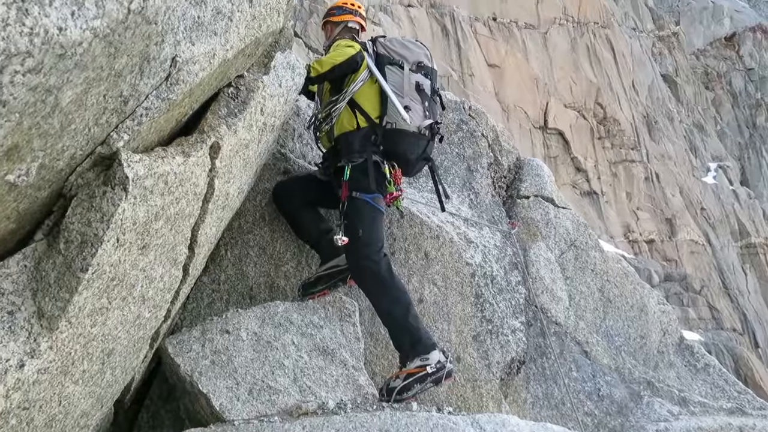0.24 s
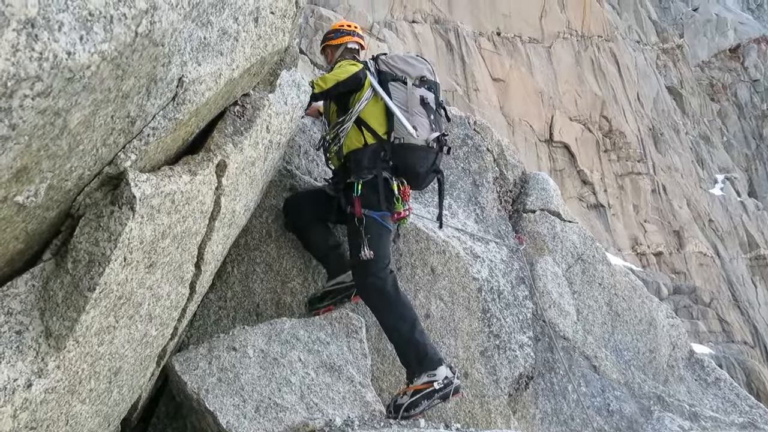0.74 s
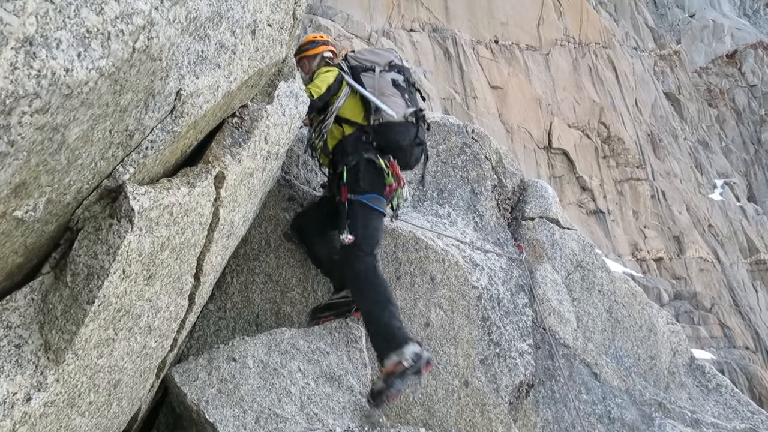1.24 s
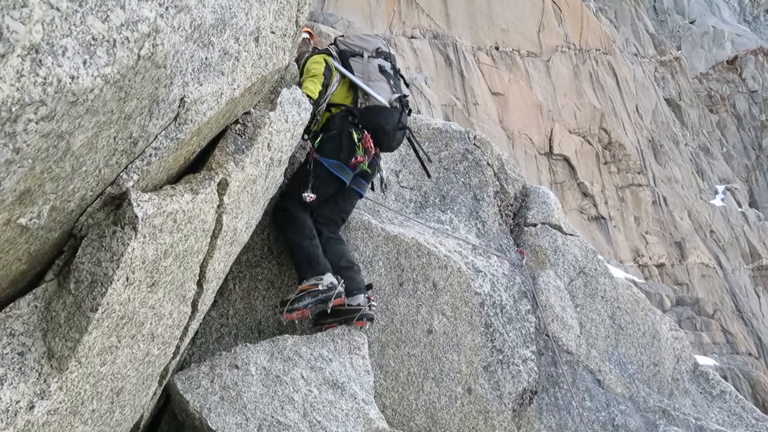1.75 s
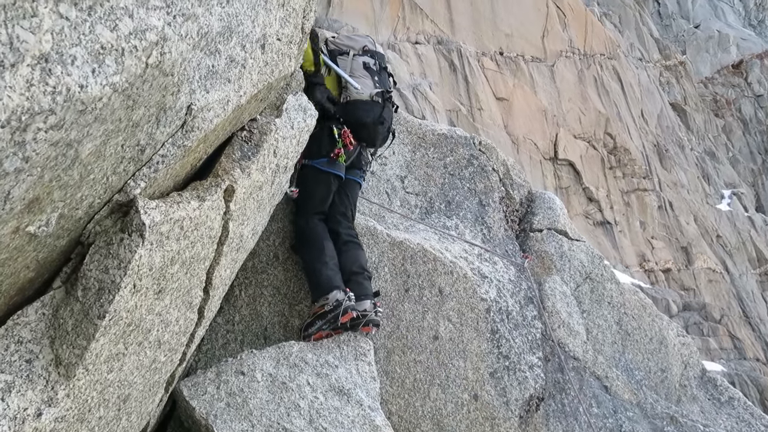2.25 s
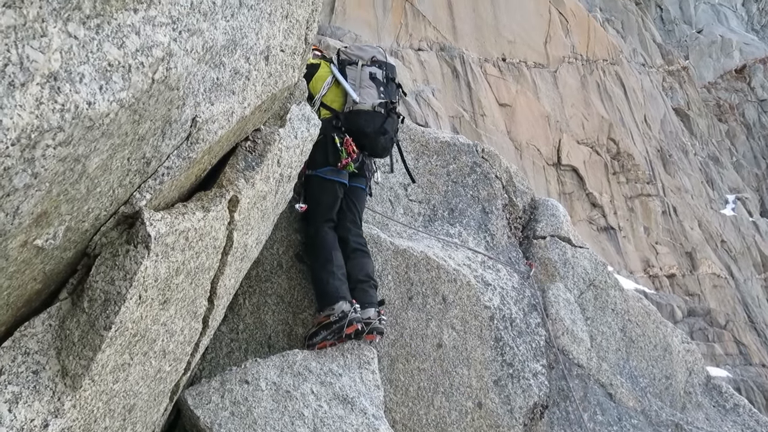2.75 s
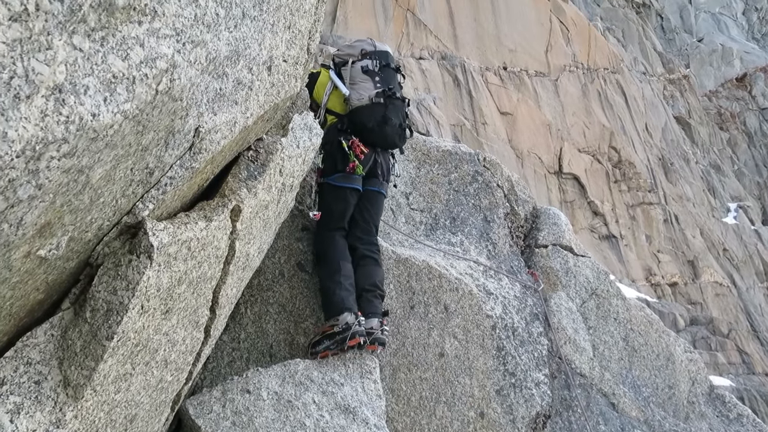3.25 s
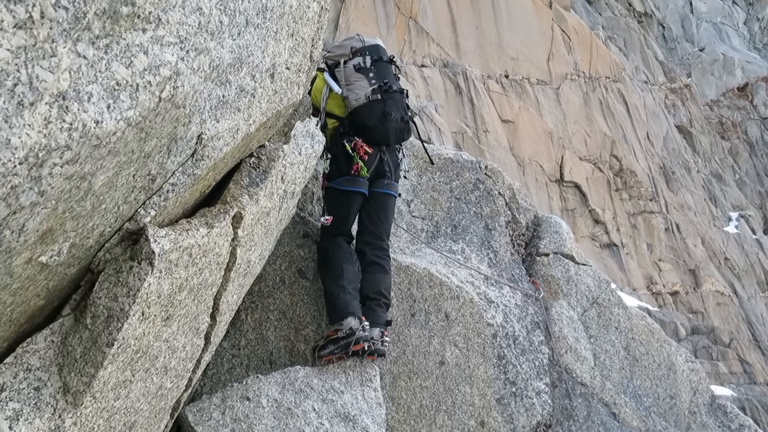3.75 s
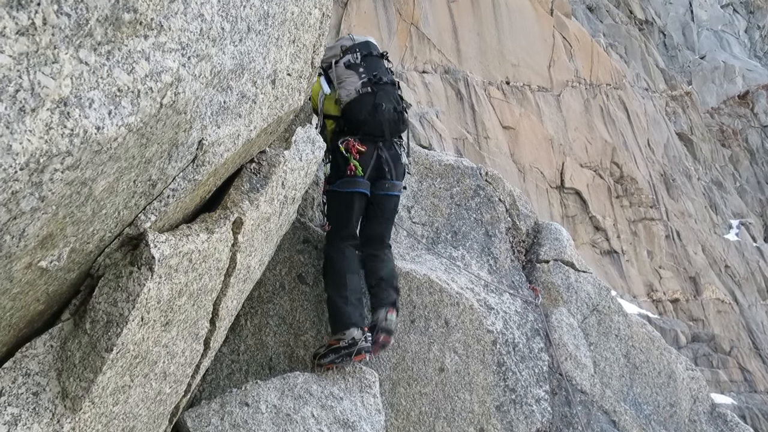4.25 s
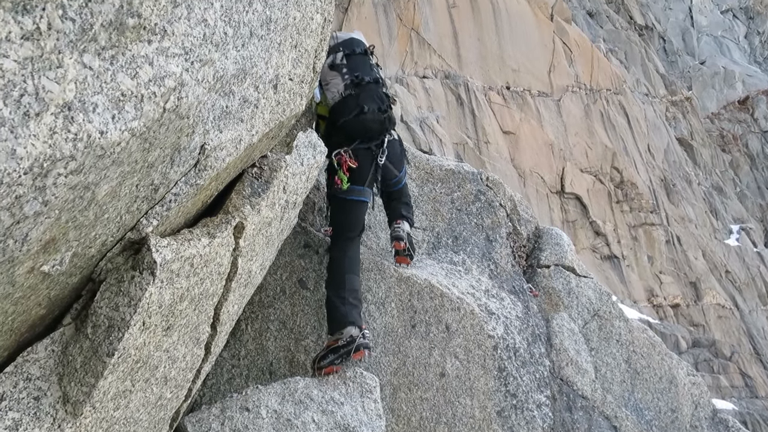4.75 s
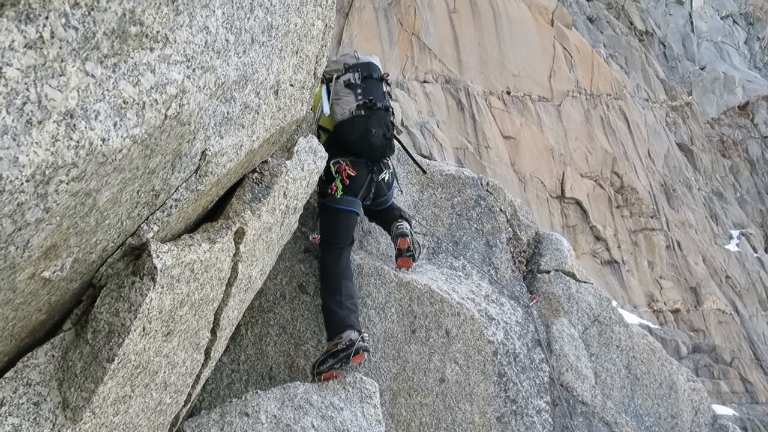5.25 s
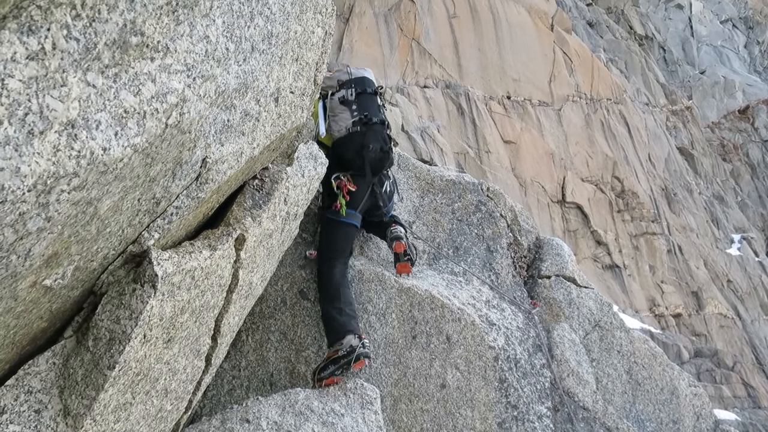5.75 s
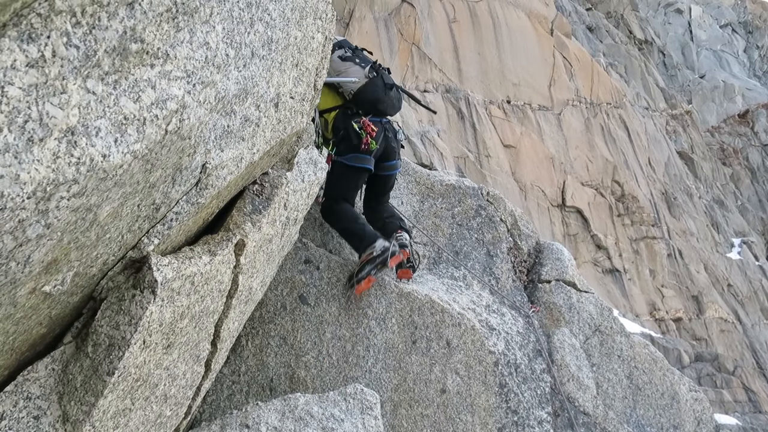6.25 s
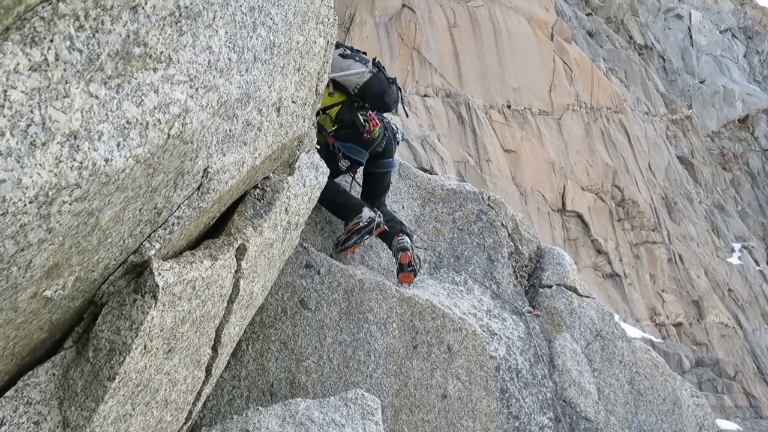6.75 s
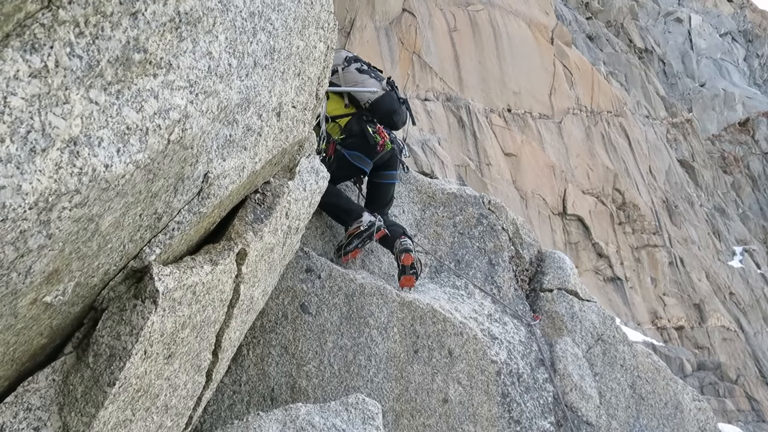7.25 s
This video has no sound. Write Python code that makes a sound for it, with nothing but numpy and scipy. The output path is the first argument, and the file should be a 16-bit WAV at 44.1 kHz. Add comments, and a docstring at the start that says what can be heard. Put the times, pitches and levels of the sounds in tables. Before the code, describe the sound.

A steady, wide rush of wind and far meltwater fills open mountain air. Close to centre, heard from a few metres, spiked boots bite and scrape rock with dry, bright clicks and low thumps, among clothing rustles, loose grit and small carabiner clinks. Activity is busy early, then a sudden, sharp, very loud metallic strike comes after four seconds; the background dips and slowly recovers through lighter clicks. A thin bird whistles far off.

```python
"""A climber in crampons scrambles up granite, heard from a few metres away in open mountain air.
Filtered noise makes the wide wind and water, the rustle of clothes and pack and the ticks of loose grit.
Steel points then click and scratch as shaped noise through resonances, and boots thud as damped sines.
Carabiners chime as sine pairs, a far bird whistles in gliding sines, and boots drag as juddering noise.
Just after 4 s one hard kick makes the limiter duck everything, and the level climbs back slowly."""
import sys
import numpy as np
from scipy import signal
from scipy.fft import rfft, irfft, next_fast_len
from scipy.io import wavfile
from scipy.ndimage import uniform_filter1d

SR = 44100
rng = np.random.default_rng(int(sys.argv[2]) if len(sys.argv) > 2 else 0)


def transcribe(u):
    """Save the signal u as a 16-bit wav file named by the first command-line argument.

    u: samples, shape (n,) or (channels, n), limited to [-1, 1]; the rate is SR.
    q: integer samples, one column per channel.
    """
    v = np.clip(np.atleast_2d(u).T, -1, 1)
    q = np.round(v * 32767).astype(np.int16)
    wavfile.write(sys.argv[1], SR, q)


N = 330309

# stereo width of every noisy sound from the climber: (f/Hz, side minus mid/dB)
CLIMBER_WIDTH = [(300, -18), (2400, -19), (5000, -4.5), (8000, -4), (14000, -1)]


def amp(db):
    """Turns decibels into an amplitude factor."""
    return 10 ** (np.asarray(db) / 20)


def evened(x):
    """Scales a signal to unit RMS."""
    return x / np.sqrt(np.mean(x ** 2) + 1e-20)


def read(points, hz):
    """Reads a spectrum at hz, interpolating on a log-frequency axis."""
    f, value = np.transpose(points)
    return np.interp(np.log(hz + 1), np.log(f), value)


def add(mix, s, sound):
    """Mixes a sound in at time s."""
    part = mix[..., max(round(s * SR), 0):][..., :sound.shape[-1]]
    part += sound[..., :part.shape[-1]]


def blow(x, db):
    """Scales each channel of a short sound to the energy of 10 ms at the level db."""
    energy = np.sum(x ** 2, -1, keepdims=True)
    return amp(db) * x / np.sqrt(energy / (SR / 100) + 1e-20)


def causal(db):
    """The minimum-phase response with this gain: it rings after a blow, never before."""
    cepstrum = irfft(np.log(amp(db)))
    half = len(cepstrum) // 2
    # fold the cepstrum onto positive time
    cepstrum[1:half] *= 2
    cepstrum[half + 1:] = 0
    return np.exp(rfft(cepstrum))


def spread(pair, width):
    """Turns two unrelated signals into left and right, with a width that depends on frequency."""
    size = pair.shape[-1]
    mid, side = rfft(pair)
    share = amp(read(width, np.fft.rfftfreq(size, 1 / SR)))
    left_right = np.array([mid + share * side, mid - share * side])
    return irfft(left_right / np.sqrt(1 + share ** 2), size)


def tinted(x, colour):
    """Gives a signal a spectrum; the result is padded to a fast transform length."""
    size = next_fast_len(N)
    gain = amp(read(colour, np.fft.rfftfreq(size, 1 / SR)))
    return irfft(rfft(x, size) * gain, size)


def wander(per_s):
    """A random curve of unit RMS: straight lines between per_s random points a second."""
    knots = rng.standard_normal(N // 16)
    return evened(np.interp(np.arange(N) * per_s / SR, np.arange(len(knots)), knots))


def valley(level_db=-43, swell_db=-0.5, flicker_db=1.0):
    """The wide rush of far wind and meltwater: coloured noise with a slow swell and a fast flicker."""
    # noise spectrum of the rush: (f/Hz, level per Hz/dB)
    rush_colour = [(15, -30), (40, -11), (120, 1.5), (300, 0.5), (550, -0.5), (770, -3), (1150, -0.5),
                   (1400, -3), (1530, -9), (2400, -10), (4200, -13.5), (9000, -18.5), (12000, -20),
                   (16000, -22.5)]
    # stereo width of the rush: (f/Hz, side minus mid/dB)
    rush_width = [(60, -19), (110, 1.5), (200, 1.5), (380, 1), (700, -2.5), (1290, -3), (2380, -5),
                  (4400, -6), (8120, -2), (15000, -2.5)]
    rush = spread(tinted(rng.standard_normal((2, N)), rush_colour), rush_width)[:, :N]
    return evened(rush) * amp(level_db + swell_db * wander(3.08) + flicker_db * wander(35))


def movement(rest_db=-51.5, rise_s=0.047, release_s=0.11):
    """How hard the climber moves: each move swells, holds and dies away over a faint rustle."""
    # reaches, pulls and leg swings that rub cloth, pack and grit, before each layer's own trim:
    # (start t/s, hold length/s, level/dB)
    moves = [(0.162, 0.052, -45.5), (1.27, 0.29, -44), (1.68, 0.14, -44), (2.067, 0.13, -39.5),
             (2.547, 0.62, -50), (3.616, 0.2, -47), (4.035, 0.024, -35.5), (4.826, 0.16, -46.5),
             (5.152, 0.078, -43), (5.542, 0.016, -52), (5.893, 0.071, -46), (7.097, 0.025, -43.5)]
    t = np.arange(N) / SR
    power = amp(rest_db) ** 2
    for s, length, db in moves:
        swell = np.minimum(t - s, 0) / rise_s
        release = np.maximum(t - s - length, 0) / release_s
        power = power + (amp(db) * np.exp(swell - release)) ** 2
    return np.sqrt(power)


def rubbing(trim_db=-1, flutter_db=2, grains_per_s=260, grain_spread_db=3.5, grain_share=0.96, grain_s=0.0027):
    """Fabric hiss and decaying snaps of grit, both following the climber's movement."""
    # noise spectrum of the rubbing: (f/Hz, level per Hz/dB)
    rub_colour = [(200, -12), (600, 5.5), (1500, -9), (3000, 5), (5000, 1.5), (7000, 0), (10000, -0.5),
                  (13000, 3), (16000, -7.5)]
    grain_db = grain_spread_db * np.minimum(rng.exponential(1, N), 3)
    grains = amp(grain_db) * (rng.random(N) < grains_per_s / SR)
    # each grain starts an exponential decay
    snaps = signal.lfilter([1], [1, -np.exp(-1 / (grain_s * SR))], grains)
    hiss, grit = rng.standard_normal((2, 2, N))
    force = hiss + grain_share * evened(grit * snaps)
    force *= amp(flutter_db * wander(70))
    sound = evened(spread(tinted(force, rub_colour), CLIMBER_WIDTH)[:, :N])
    return sound * amp(trim_db) * movement()


def loose_grit(trim_db=-3, ticks_per_s=26, spread_db=2, tick_s=0.0011,
               low_hz=2500, high_hz=13000, octaves=.7, size=1024):
    """Crumbs of granite and small buckles tick at random as resonant bursts, louder in each move."""
    out, effort = np.zeros((2, N)), movement()
    t, hz = np.arange(size) / SR, np.fft.rfftfreq(size, 1 / SR) + 1
    chance, strength, pitch = rng.random(N), rng.standard_normal(N), rng.random(N)
    noise = rng.standard_normal((2, N + size))
    for at in np.flatnonzero(chance < ticks_per_s / SR):
        centre_hz = low_hz * (high_hz / low_hz) ** pitch[at]
        colour = -10 * np.log10(1 + (np.log2(hz / centre_hz) / octaves) ** 2)
        burst = noise[:, at:at + size] * np.exp(-t / tick_s)
        tick = spread(irfft(rfft(burst) * causal(colour)), CLIMBER_WIDTH)
        add(out, at / SR, effort[at] * blow(tick, trim_db + spread_db * strength[at]))
    return out


def contacts(bite_skid_s=0.0022, bite_skid_db=-17.5, skid_share=0.67,
             bar_hz=2470, bar_db=2.5, point_hz=4630, point_db=2.5):
    """Bites skid quietly and then catch at once; scratches swell for skid_share of their fade.

    Each is (s, dB, skid s, skid dB, crunch s, tilt, broad ring Hz, its dB, narrow ring Hz, its dB).
    """
    # a steel point biting into rock; a free point rings high, one under the climber's weight low:
    # (t/s, level over 10 ms/dB, crunch decay/s, tilt/dB per octave, broad ring f/Hz, ring height/dB)
    bites = [(0.078, -33.5, 0.0056, 3.5, 5440, 5), (0.141, -29, 0.0039, 2, 5600, 3),
             (0.153, -25, 0.0047, 0.5, 5300, 10.5), (0.3507, -43, 0.0014, 2, 11600, 15),
             (0.417, -41.5, 0.0024, 14, 10000, 3), (0.4844, -36.5, 0.0028, 0, 4400, 10),
             (0.541, -37, 0.0021, 2.5, 7300, 3), (0.8455, -31.5, 0.00055, 2.5, 620, 25),
             (1.242, -17, 0.0033, 1.5, 6160, 13.5), (1.2872, -22.5, 0.0062, 0, 6440, 13),
             (1.6613, -28.5, 0.0049, -2, 2290, 5.5), (1.7644, -23, 0.00082, -0.5, 4180, 15.5),
             (1.7736, -25, .001, 0, 5270, 20.5), (1.902, -30.5, 0.005, -1.5, 5170, 15),
             (2.1078, -23, 0.013, -4, 560, -10), (2.1483, -28, 0.00042, -3.5, 5200, 6),
             (2.2, -33.5, .001, 4, 11800, 6), (2.2565, -29, 0.0013, 4.5, 6100, 4),
             (2.398, -27, 0.00076, -3.5, 2160, 6), (2.585, -31.5, 0.0011, 1, 10100, 4),
             (2.8612, -35, 0.00041, -4, 4000, 2), (2.987, -37.5, 0.007, -0.5, 10750, 8),
             (3.1083, -30.5, 0.00045, -1.5, 5160, 10.5), (3.393, -36, .002, 1, 9400, 4),
             (3.4419, -29.5, 0.0028, -0.5, 4400, 9.5), (3.6274, -33.5, 0.003, -3.5, 3400, 9),
             (3.8645, -31, 0.0081, -2, 680, 6), (3.9615, -30, 0.0036, -3.5, 600, 4),
             (3.9752, -25.5, 0.0051, -2, 3300, 5), (4.0478, 4.5, 0.0025, 3, 6500, 9.5),
             (4.2972, -24.5, 0.0002, 1.5, 680, 13), (4.4435, -26, 0.0064, -.2, 600, 3),
             (4.5427, -37, 0.0012, 0, 6100, 9), (4.607, -26.5, 0.00078, 0, 6660, 9),
             (4.783, -33, 0.0033, 0.5, 586, 18), (4.911, -33.5, .001, 4, 5300, 10),
             (4.9304, -32, 0.0033, 3, 8000, 5), (5.0035, -35.5, 0.00091, 1.5, 5500, 6),
             (5.0352, -34, 0.0016, -1, 5600, 7), (5.1235, -22.5, .0013, 4, 8700, 8),
             (5.203, -30.5, 0.00056, -2, 8600, 20), (6.052, -37, .001, 0, 12000, 5),
             (6.1425, -36, 0.0017, 1, 2960, 6), (6.1884, -36, 0.0028, -1, 13000, 10),
             (6.7099, -34, 0.0037, -4, 576, 13), (6.8154, -23.5, 0.0098, -1.5, 684, 15),
             (6.9287, -37.5, .006, 2.5, 700, 8), (6.9939, -38, 0.00056, -9.5, 2200, 9),
             (7.0355, -37, .004, 3, 12500, 5), (7.0883, -38, .001, -1, 3700, 4),
             (7.1387, -37.5, 0.0021, -2, 3200, 3), (7.173, -40, 0.0022, -1.5, 3400, 4),
             (7.258, -34.5, 0.009, 4, 11500, 8)]
    # a point scratching across crystals:
    # (peak t/s, level over 10 ms/dB, fade/s, tilt/dB per octave, squeal f/Hz, height before focus/dB)
    scratches = [(0.252, -32, 0.011, -2, 3490, 10), (0.7127, -33.5, 0.0064, 2.5, 3270, 20),
                 (0.87, -28.5, 0.016, -3, 3260, 5), (1.3282, -28, 0.0093, 1, 4000, -3),
                 (1.3437, -27, 0.0094, -0.5, 6500, -12), (2.1578, -34, 0.015, -2.5, 3120, 2),
                 (2.244, -37, .006, -2.5, 4450, 6), (3.519, -29.5, 0.013, -1, 3300, -4),
                 (3.606, -31, 0.0067, 0, 2890, 18), (3.6563, -36, .009, -1.5, 3100, 4),
                 (3.7264, -32.5, .014, 0, 2880, 12), (3.7457, -34, 0.0088, -3.5, 4600, 5),
                 (4.0546, -3.5, 0.004, -1.2, 2350, 6), (4.0698, -10.5, 0.0095, -1, 2390, 8),
                 (4.0925, -20.5, 0.0055, -2, 4300, 0), (4.2756, -29, 0.0092, -0.5, 2260, 13),
                 (4.8231, -14.5, .0033, 2.5, 2880, 9), (4.8586, -32, 0.012, 0, 4870, 7),
                 (5.2318, -33.5, 0.01, 2, 4400, 11), (5.9354, -31.5, 0.016, -1.7, 7750, 9),
                 (6.2443, -39.5, 0.0076, -1.5, 2820, 18), (7.303, -38, 0.008, -9.5, 2800, 6)]
    # the crampon's side bar answers every bite
    for s, db, crunch, tilt, ring_hz, ring_db in bites:
        yield s, db, bite_skid_s, bite_skid_db, crunch, tilt, ring_hz, ring_db, bar_hz, bar_db
    # the steel point rings broadly under every scratch
    for s, db, fade, tilt, squeal_hz, squeal_db in scratches:
        yield s, db, skid_share * fade, 0, fade, tilt, point_hz, point_db, squeal_hz, squeal_db


def frame_ring(hz, width_hz=90):
    """The click itself plus the short ring of each steel mode, as a complex response."""
    # modes of the steel crampon frame: (f/Hz, level over the plain click/dB)
    steel_modes = [(2385, -10), (4338, -5.5), (6058, -8), (6582, -10), (6911, -12), (8720, -35),
                   (8919, -13), (11005, -9), (11980, -5), (12720, 4), (14031, -17)]
    return 1 + sum(amp(db) / (1 + 2j * (hz - mode_hz) / width_hz) for mode_hz, db in steel_modes)


def ring(hz, centre_hz, height_db, focus_db=2.5, octaves=.095):
    """A sharp resonance, in dB, standing on a flat spectrum; focus_db raises its height."""
    skirt = (1 + (np.log2(hz / centre_hz) / octaves) ** 2) ** 2
    return 10 * np.log10(1 + amp(height_db + focus_db) ** 2 / skirt)


def crampons(scatter_db=-11, scatter_s=0.0097, far_db=-25, far_s=0.02, broad_octaves=0.34,
             grit_db=3, direct_side_db=-2, scatter_side_db=3, size=8192):
    """A point skids, bites and crushes grains; steel rings briefly and nearby rock scatters the sound."""
    out = np.zeros((2, N))
    hz = np.fft.rfftfreq(size, 1 / SR) + 10  # the offset keeps the logarithms finite
    t = (np.arange(size) - size // 8) / SR  # zero at the bite, with room for the skid ahead
    after, steel = np.maximum(t, 0), frame_ring(hz)
    echo = np.hypot(amp(scatter_db) * np.exp(-after / scatter_s), amp(far_db) * np.exp(-after / far_s))
    for s, db, skid, skid_db, crunch, tilt, broad_hz, broad_db, narrow_hz, narrow_db in contacts():
        contact, scatter, grit = rng.standard_normal((3, 2, size))
        onset = np.where(t < 0, amp(skid_db) * np.exp(-(t / max(skid, 1 / SR)) ** 2), 1)
        roughness = amp(grit_db * evened(uniform_filter1d(grit[0], size=24)))
        contact *= onset * np.exp(-after / max(crunch, 1 / SR)) * roughness
        scatter *= onset * echo
        # rows are mid and side
        force = contact * amp([[0], [direct_side_db]]) + scatter * amp([[0], [scatter_side_db]])
        colour = tilt * np.log2(np.maximum(hz, 600) / 4000)
        colour += broad_db * np.exp(-.5 * (np.log2(hz / broad_hz) / broad_octaves) ** 2)
        colour += ring(hz, narrow_hz, narrow_db)
        # small points radiate little bass; the extreme treble rolls off too
        colour -= 10 * np.log10(1 + (480 / hz) ** 4 + (hz / 15000) ** 20)
        sound = irfft(rfft(force) * steel * causal(colour))
        add(out, s + t[0], blow(spread(sound, CLIMBER_WIDTH), db))
    return out


def boots(thump_cycles=2.22, knock_cycles=2.9, knock_hz=458, rise_s=0.0011, rattle=0.5, side_db=-14, size=6000):
    """Each footfall rings the heel and the stiff sole for a few cycles, roughened by the settling foot."""
    # weight landing on a boot, levels over 10 ms: (t/s, heel thump level/dB, thump f/Hz, sole knock level/dB)
    steps = [(0.078, -33, 185, -45), (0.141, -34, 181, -36.5), (0.163, -34, 90.5, -53),
             (0.845, -32.5, 195, -40), (0.877, -27.5, 118, -42), (0.951, -46, 106, -38),
             (1.344, -23.5, 320, -33.5), (2.108, -30.5, 192, -20), (2.127, -32, 190, -35),
             (2.158, -31, 228, -45), (2.201, -36, 150, -34), (2.241, -33.5, 144, -32.5),
             (3.327, -41.5, 223, -41), (3.513, -27.5, 208, -41), (3.628, -35, 172, -37),
             (3.655, -35, 191, -45), (3.724, -36, 229, -35), (3.865, -34, 174, -32.5),
             (3.9595, -29, 189, -27), (4.049, -12.5, 156, -16.5), (4.072, -21, 167, -23.5),
             (4.296, -28.5, 190, -35), (4.445, -38, 138, -27), (4.821, -32.5, 134, -34.5),
             (6.816, -28.5, 205, -39)]
    out, t = np.zeros((2, N)), np.arange(size) / SR
    for s, heel_db, heel_hz, sole_db in steps:
        for db, hz, cycles in (heel_db, heel_hz, thump_cycles), (sole_db, knock_hz, knock_cycles):
            band = signal.butter(2, [hz * 0.56, hz * 1.58], "band", fs=SR)
            settle, side = evened(signal.lfilter(*band, rng.standard_normal((2, size))))
            mid = np.sin(2 * np.pi * hz * t) + rattle * settle
            pair = mid + amp(side_db) * np.array([side, -side])
            envelope = (1 - np.exp(-t / rise_s)) * np.exp(-t * hz / cycles)
            add(out, s, blow(pair * envelope, db))
    return out


def carabiners(rise_s=0.00066, partner_db=-13, partner_ratio=1.37, skew=0.23, size=16000):
    """A lightly knocked carabiner rings with a main mode and a weaker, higher partner."""
    # hardware swinging on the harness: (t/s, main mode level before its envelope/dB, f/Hz, t60/s)
    chimes = [(.25, -50, 6070, .27), (.708, -27, 3250, 0.05), (.71, -50, 6500, 0.23), (.88, -53, 6200, .3),
              (1.179, -32.5, 2380, 0.057), (3.604, -36, 2920, .07), (4.715, -44, 2800, 0.21),
              (4.89, -35, 1890, 0.055), (5.23, -28.5, 4240, 0.06), (6.24, -35.5, 2860, .1)]
    out, t = np.zeros((2, N)), np.arange(size) / SR
    for s, db, hz, t60 in chimes:
        phase = skew * rng.standard_normal((2, 1))  # differs between left and right
        modes = np.sin(2 * np.pi * hz * t + phase)
        modes = modes + amp(partner_db) * np.sin(2 * np.pi * hz * partner_ratio * t - phase)
        envelope = (1 - np.exp(-t / rise_s)) * np.exp(-np.log(1000) * t / t60)
        add(out, s, amp(db) * modes * envelope)
    return out


def bird(waver_hz=35, fading_db=3, droop_hz_per_s=3300):
    """Thin whistles that rise and fall, wavering and fading on their way across the valley."""
    # arched whistles; longer ones droop further at their ends: (t/s, length/s, top f/Hz, RMS level/dB)
    whistles = [(.86, .11, 4700, -60), (1.94, .15, 4600, -61), (2.79, .15, 4650, -60),
                (3.16, .18, 4480, -60), (3.6, .16, 4420, -58), (4.42, .15, 4580, -58),
                (5.378, .16, 4470, -52), (5.93, .16, 4620, -58)]
    out, waver, fading = np.zeros(N), waver_hz * wander(400), amp(fading_db * wander(110))
    for s, length, top_hz, db in whistles:
        u = np.linspace(-1, 1, int(length * SR))
        now = int(s * SR) + np.arange(len(u))
        hz = top_hz - droop_hz_per_s * length * u ** 2 + waver[now]
        shape = np.cos(np.pi / 2 * u) ** .5
        whistle = np.sin(2 * np.pi * np.cumsum(hz) / SR) * shape * fading[now]
        add(out, s, amp(db) * evened(whistle))
    return out


def drags(judder_db=2.0, judder_per_s=350, fade=0.15):
    """Sticking and slipping on coarse crystals: a juddering band of noise for each slide."""
    # a boot sliding or rocking under load, steel high and rubber low:
    # (t/s, length/s, RMS level/dB, centre f/Hz, width/octaves)
    slides = [(0.876, 0.083, -45, 124, 0.57), (1.143, 0.23, -48.5, 184, 1),
              (1.322, 0.024, -33.5, 820, 0.25), (2.045, 0.059, -35, 11400, 0.82),
              (2.158, .08, -38.5, 480, .45), (3.51, .3, -47, 160, 1), (4.213, 0.13, -43, 258, 0.96),
              (5.146, 0.076, -44, 9800, 0.41), (5.326, .013, -40.5, 9500, 0.52), (6.509, .02, -46, 9000, 1),
              (6.813, 0.031, -39.5, 75, .5)]
    out, judder = np.zeros((2, N)), amp(judder_db * wander(judder_per_s))
    for s, length, db, centre_hz, octaves in slides:
        size = int(length * SR)
        hz = np.fft.rfftfreq(size, 1 / SR) + 1
        slips = rng.standard_normal((2, size)) * judder[int(s * SR):][:size]
        colour = np.exp(-.5 * (np.log2(hz / centre_hz) / octaves) ** 2)
        band = irfft(rfft(slips) * colour, size)
        slide = spread(band, CLIMBER_WIDTH) * signal.windows.tukey(size, fade)
        add(out, s, amp(db) * evened(slide))
    return out


def scene(right_db=0.25):
    """Sums the climber's layers, leans them slightly right, and sets them in the valley with the bird."""
    climber = rubbing() + loose_grit() + crampons() + boots() + carabiners() + drags()
    return valley() + climber * amp([[-right_db], [right_db]]) + bird()


def record(dry, limit_db=-4.0, recovery_db_per_s=22, edge_hz=16100):
    """A limiter drops the gain at once and recovers slowly; peaks clip; then the band limit."""
    power_db = 10 * np.log10(abs(uniform_filter1d((dry ** 2).mean(0), size=90)) + 1e-12)
    # hold each peak level and let it fall at the recovery rate
    fall = np.arange(N) / SR * recovery_db_per_s
    held_db = np.maximum.accumulate(power_db + fall) - fall
    over_db = np.maximum(held_db - limit_db, 0)
    limited = np.clip(dry / amp(over_db), -1, 1)
    low_pass = signal.firwin(511, edge_hz, window=("kaiser", 9), fs=SR)
    return signal.oaconvolve(limited, low_pass[None], "same")


dry = scene()
out = record(dry)
transcribe(out)
```